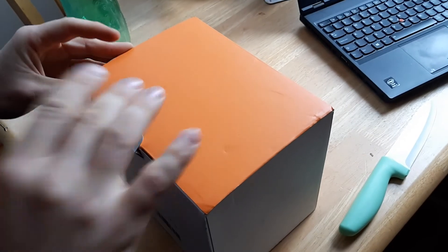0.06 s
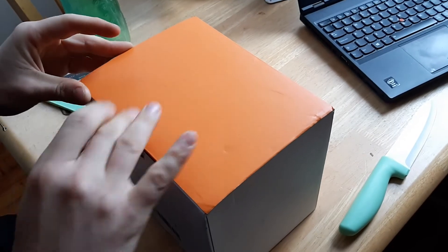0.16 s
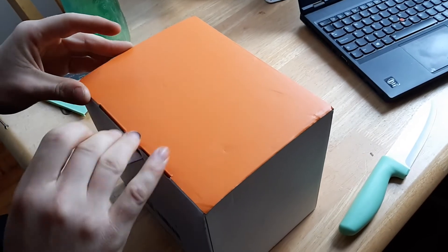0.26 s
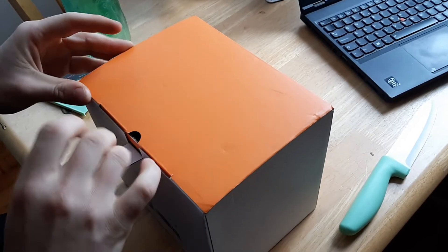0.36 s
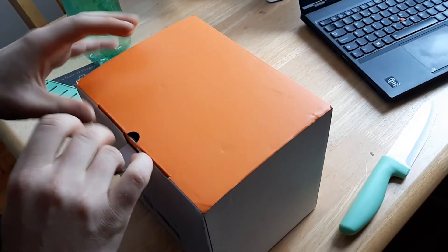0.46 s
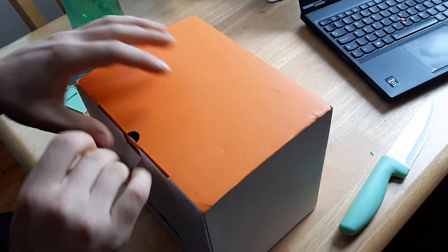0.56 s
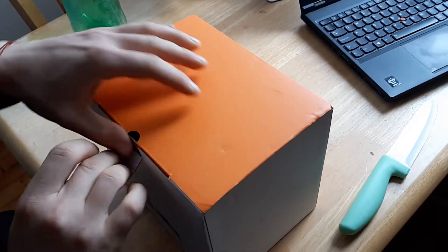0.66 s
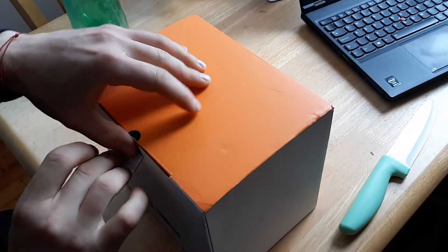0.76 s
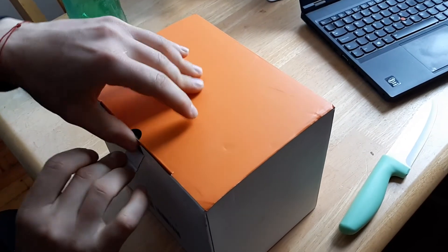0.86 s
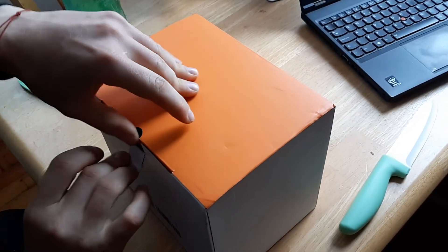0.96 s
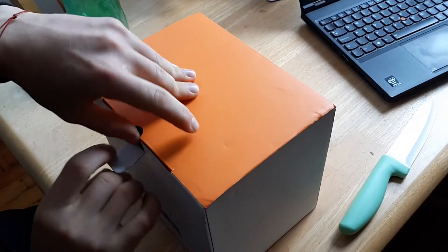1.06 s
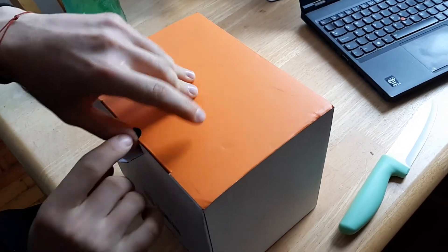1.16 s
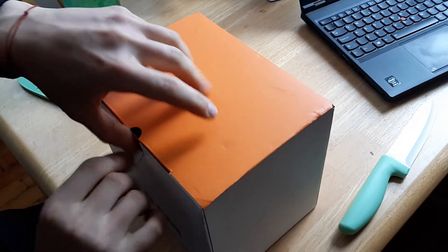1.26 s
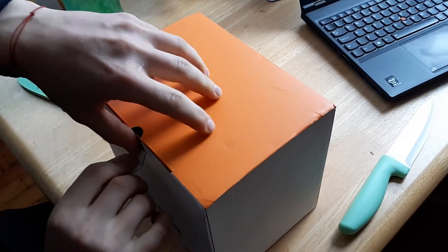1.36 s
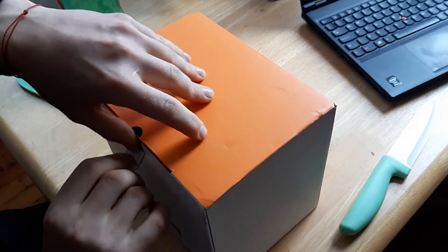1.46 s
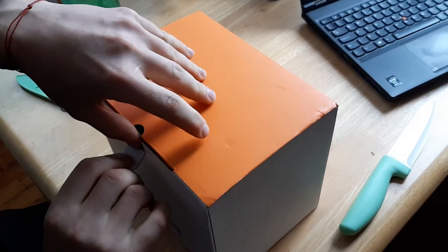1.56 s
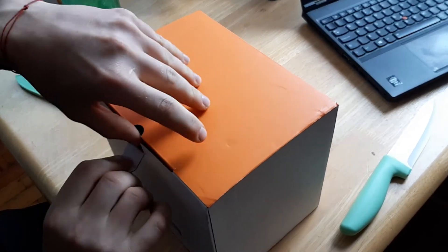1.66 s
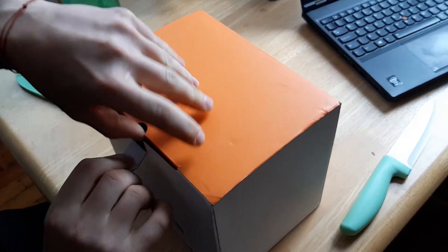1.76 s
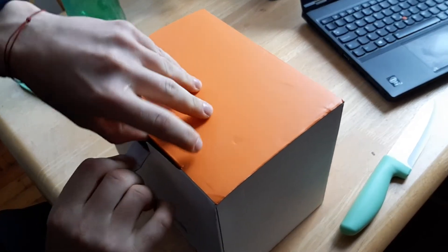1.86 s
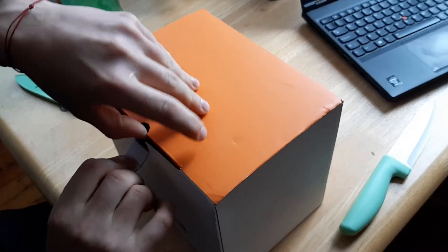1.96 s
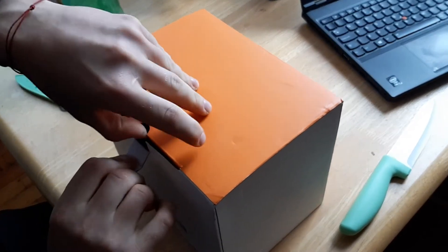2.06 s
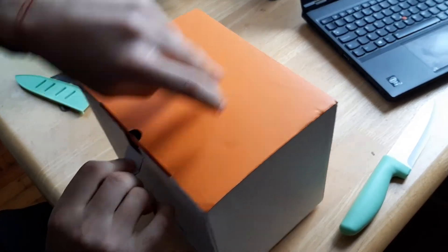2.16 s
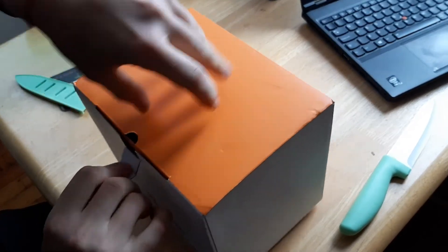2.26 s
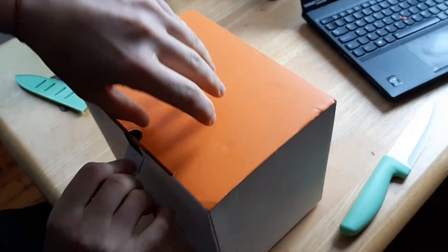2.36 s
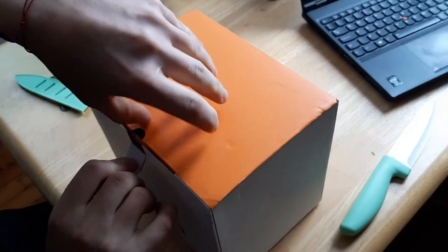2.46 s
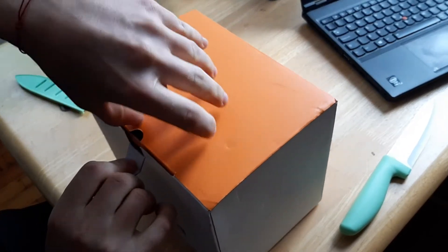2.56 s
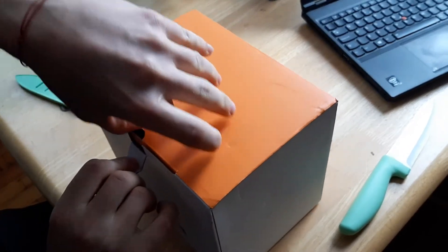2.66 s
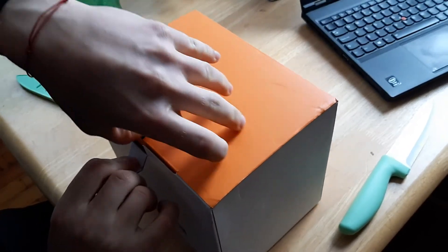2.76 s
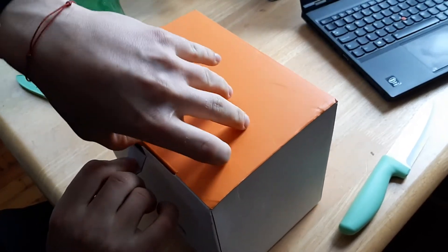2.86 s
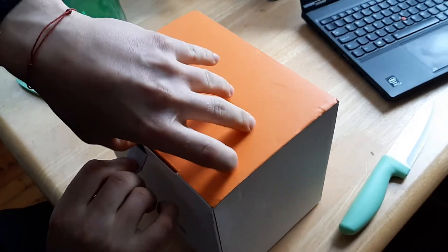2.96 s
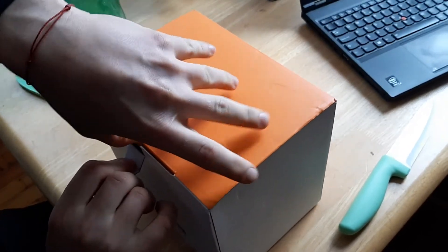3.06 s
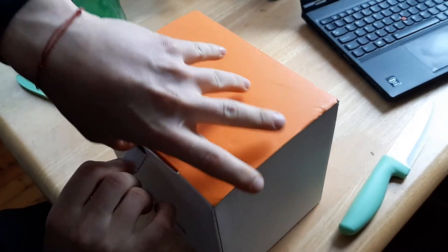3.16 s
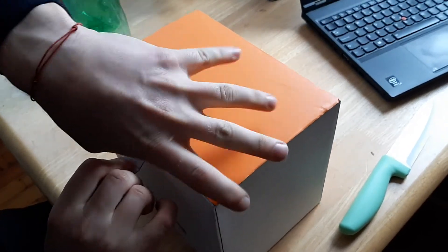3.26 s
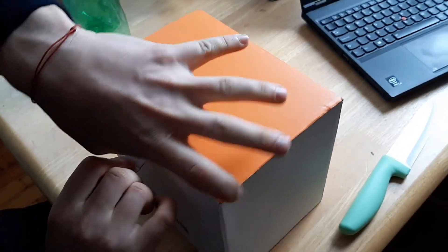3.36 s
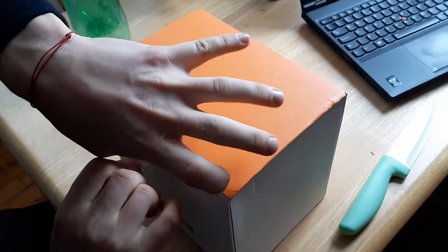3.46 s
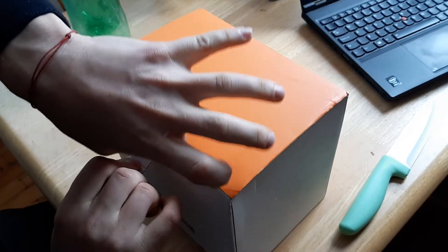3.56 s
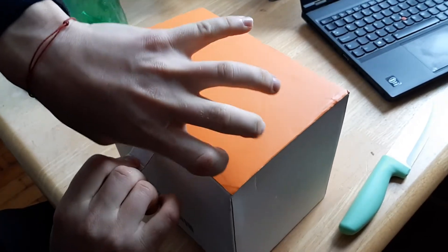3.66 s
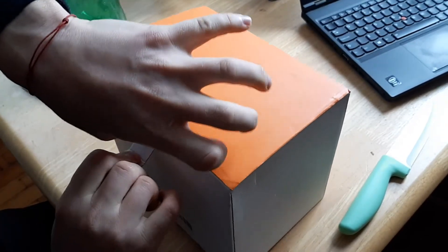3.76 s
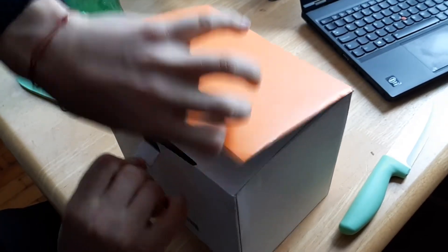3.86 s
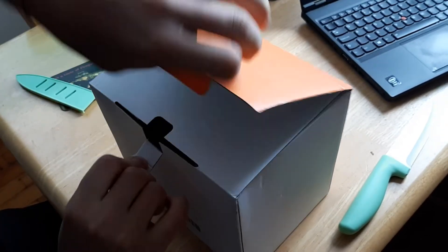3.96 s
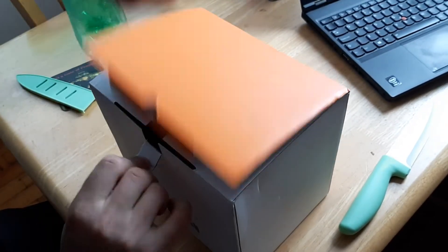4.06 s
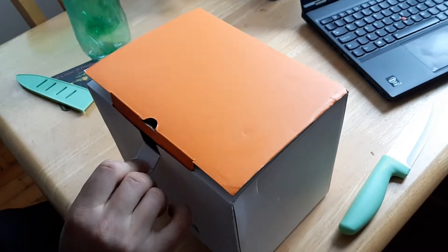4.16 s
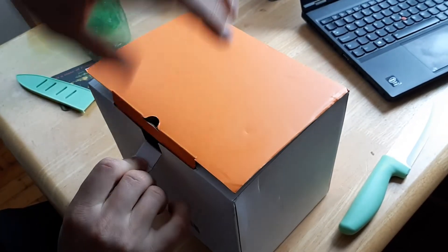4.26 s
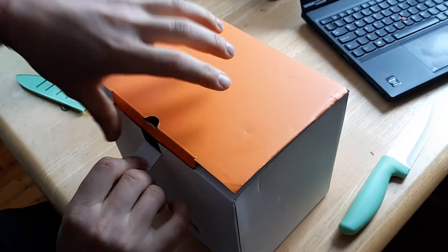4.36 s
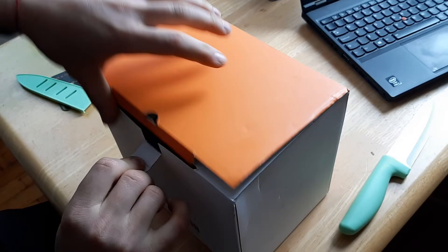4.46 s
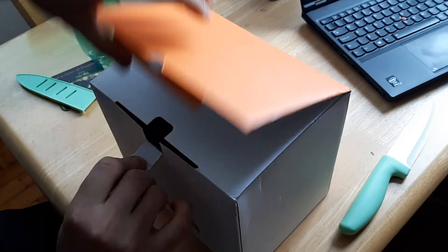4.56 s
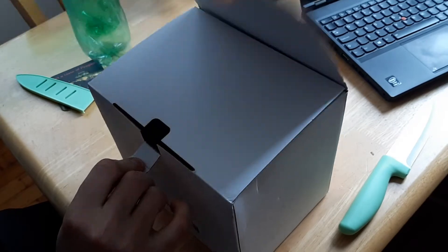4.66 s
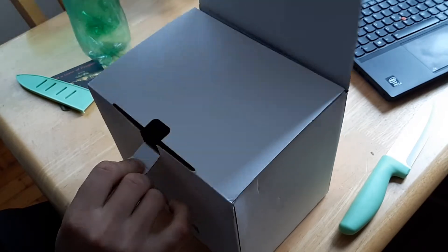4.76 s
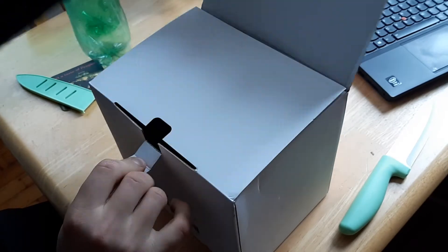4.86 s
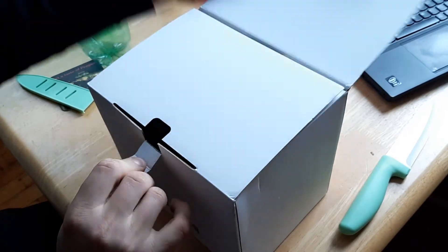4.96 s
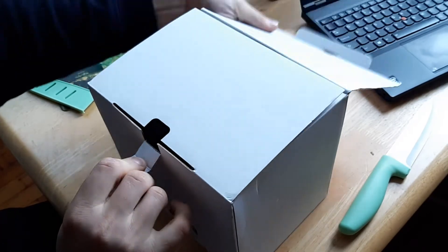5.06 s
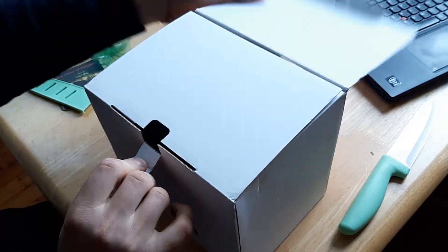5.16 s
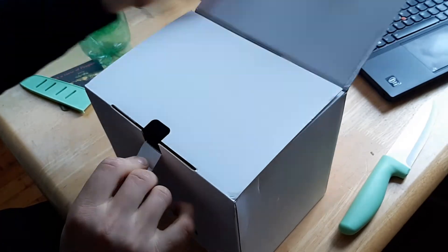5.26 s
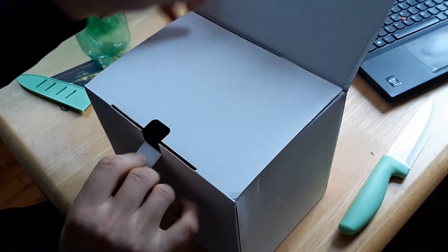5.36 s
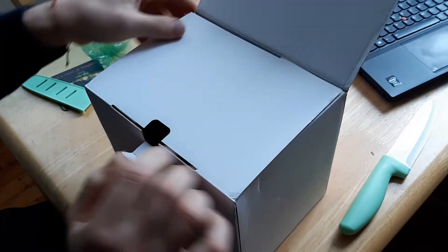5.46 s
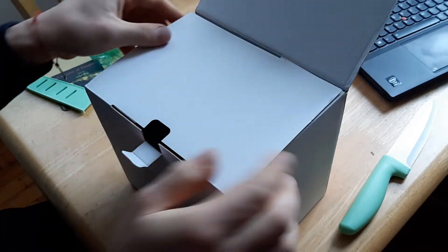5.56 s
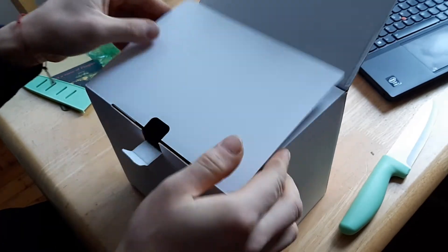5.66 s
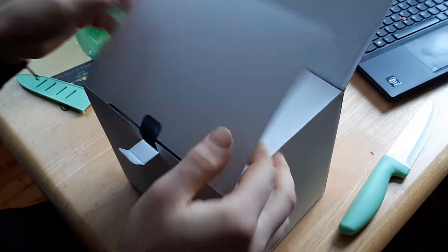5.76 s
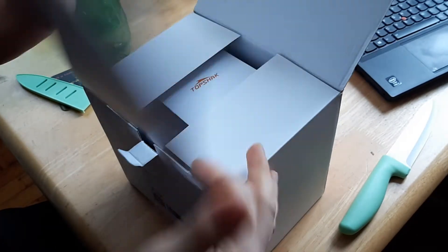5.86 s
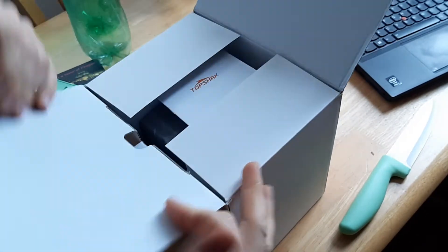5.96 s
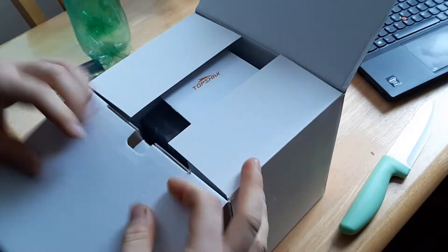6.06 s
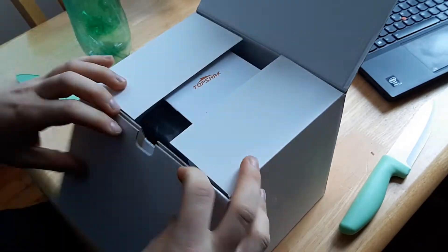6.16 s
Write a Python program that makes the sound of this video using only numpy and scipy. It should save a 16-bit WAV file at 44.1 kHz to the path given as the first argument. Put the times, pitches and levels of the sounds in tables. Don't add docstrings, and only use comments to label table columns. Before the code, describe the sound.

A stiff hollow paperboard box is opened on a wooden table, very close in stereo, in a small bare room with faint hiss. From 0 to 0.8 s there are quiet finger taps, tiny tab clicks and faint brushing. At about 1.0 and 1.25 s come firmer hollow thumps with bright clicks and scratchy rubs, then soft sliding and small ticks. A sharper knock and scrape land at 2.1 s, followed by gentle strokes. At 3.4 to 3.6 s the board snaps, crackles and drags, and the taut lid squeaks loudly. At 3.84 s it pops free in by far the loudest blow, boomy and cracking, ringing about half a second. A small snap follows at 4.1 s, lighter clicks and a short squeak at 4.55 s, a flap swish and puff at 4.8 s, soft strokes near 5.2 s, then knocks, a faint squeak at 5.77 s and scratchy flap scrapes at 6.05 s.

```python
import sys
import numpy as np
from scipy import signal
from scipy.fft import rfft, irfft, next_fast_len
from scipy.io import wavfile
from scipy.ndimage import uniform_filter1d, map_coordinates

SR = 44100
rng = np.random.default_rng(int(sys.argv[2]) if len(sys.argv) > 2 else 0)


def wrap_up_sound(samples):
    columns = np.atleast_2d(samples).T
    tamed = np.clip(columns, -1, 1)
    steps = np.round(tamed * 32767).astype(np.int16)
    wavfile.write(sys.argv[1], SR, steps)


def invert_db(level):
    return 10 ** (np.asarray(level, dtype=float) / 20)


N = 273861
RISE_DB = 39
WANDER_HZ = 45

# (pitch [Hz], width [Hz], level [dB])
BOX_MODES = [(275, 41, -8.5), (323.5, 22, -8.5), (376.2, 12, -2), (544, 220, -14)]
# (pitch [Hz], width [Hz], level [dB])
TABLE_MODES = [(88, 44, -10), (137.6, 16, 0.5), (200, 18, -1)]
# (pitch [Hz], width [Hz], level [dB])
LID_MODES = [(690, 116, -10.5), (803, 54, -11.5), (941, 130, -14), (1300, 430, -22)]
# (frequency [Hz], level [dB])
FIZZ_COLOUR = [(6500, -35.5), (8300, -3), (9500, 3), (12000, 0.5), (14000, 0.5), (15700, 6.5), (16000, -27)]


def unit(x):
    return x / np.sqrt(np.mean(x ** 2) + 1e-20)


def peaked(x):
    return x / np.abs(x).max()


def along(points, hz):
    f, v = np.transpose(points)
    return np.interp(np.log(hz + 1), np.log(f + 1), v)


def filtered(x, response):
    n = x.shape[-1]
    m = next_fast_len(n + min(n, 8192))
    hz = np.fft.rfftfreq(m, 1 / SR)
    return irfft(rfft(x, m) * response(hz), m)[..., :n]


def coloured(x, spectrum):
    return unit(filtered(x, lambda hz: invert_db(along(spectrum, hz))))


def resonant(modes):
    def response(f):
        total = 0
        for k, (hz, width, db) in enumerate(modes):
            total = total + (-1) ** k * invert_db(db) * 1j * f * width / (hz * hz - f * f + 1j * f * width)
        return total
    return response


def uneven(modes, changes_db):
    return resonant([(hz, width, db + change) for (hz, width, db), change in zip(modes, changes_db)])


def no_bass(hz, edge_hz):
    return (1j * hz / (edge_hz + 1j * hz)) ** 3


def diffuse(pair):
    # (frequency [Hz], left-right likeness [-1 to 1])
    likeness = [(60, 1), (130, 0.88), (290, 0.82), (640, 0.11), (1410, -0.32), (3100, 0.23), (6820, -0.21),
                (15000, 0.0)]
    turn = lambda hz: np.arccos(np.clip(along(likeness, hz), -1, 1)) / 2
    mid, side = filtered(pair, lambda hz: np.array([np.cos(turn(hz)), np.sin(turn(hz))]))
    return np.array([mid + side, mid - side])


def stroke_db(late, peak_db, rise_s, t60_s):
    return peak_db + np.where(late < 0, RISE_DB * late / np.abs(rise_s), -60 * late / np.abs(t60_s))


def strokes(rows, column=2):
    rows, t = np.array(rows)[:, :, None], np.arange(0, N, 40) / SR
    db = stroke_db(t - rows[:, 0], rows[:, column], rows[:, 1], rows[:, -1])
    return np.interp(np.arange(N) / SR, t, np.sqrt(np.sum(invert_db(2 * db), axis=0)))


def hands():
    # (time [s], left over right [dB])
    balance = [(0, -0.5), (.7, 3.5), (1.2, 3.5), (1.8, -0.5), (2.2, 2), (2.9, -2.5), (3.4, 1), (3.84, 1.5),
               (4.2, -0.5), (4.7, 3.5), (5.2, -0.5), (5.6, 2.5), (6.2, 1.5)]
    s, pan_db = np.transpose(balance)
    return invert_db(np.interp(np.arange(N) / SR, s, pan_db) * [[.5], [-.5]])


def pop():
    # (pitch [Hz], level [dB], 60 dB decay time [s])
    jolted_modes = [(129.8, -7.5, 0.48), (198, -9.5, 0.42), (248, 0.5, 0.37), (318.3, 0, 0.22),
                    (360, 1, .2), (458.4, -12, 0.29), (571, -16.5, 0.43), (663, -11.5, 0.13),
                    (827, -6, 0.27)]
    t, out = np.arange(SR) / SR, np.zeros((2, N))
    rock = lambda: map_coordinates(rng.standard_normal(60), [t * WANDER_HZ])
    ring = 0
    for hz, db, t60 in jolted_modes:
        level = invert_db(db - 60 * t / t60 + 1.8 * rock())
        apart = (.05 + hz / 1000) * np.array([rock(), rock()])
        ring = ring + level * np.sin(2 * np.pi * hz * t + .4 * rock() + apart)
    swell = 1 - np.exp(-t / 0.006)
    start = round(3.839 * SR)
    out[:, start:start + SR] = invert_db(-4.5) * peaked(filtered(ring * swell, lambda hz: no_bass(hz, 30)))
    return out


def thumps():
    # (time [s], peak [dB], pitch of the struck panel [Hz], lid ring [dB])
    held = [(0.397, -38.5, 297, 2), (0.984, -26.5, 302, -4), (1.011, -20.5, 414, -20),
            (1.031, -20, 332, 1.5), (1.203, -26.5, 335, 0), (2.216, -24, 384, 3), (3.394, -41, 305, 6),
            (3.416, -18, 314, -0.5), (3.533, -33, 394, 12.5), (3.563, -32.5, 380, 5.5),
            (5.398, -25.5, 370, -9)]
    tapped = [(0.196, -41, 417, -20), (0.292, -47.5, 277, -4), (0.348, -36, 270, 10.5),
              (0.741, -42.5, 322, -12), (0.926, -49, 405, 7), (0.936, -34.5, 370, -2.5),
              (1.235, -44, 328, 3), (1.242, -20.5, 319, -0.5), (1.541, -41, 287, -7),
              (1.577, -43, 290, -12), (1.934, -46.5, 350, -4), (2.075, -26.5, 341, -6.5),
              (2.125, -16.5, 306, -8), (2.395, -35.5, 311, -3), (3.333, -52, 317, 8.5),
              (3.839, -9.5, 340, 0.5), (3.848, -18, 347.5, -11), (4.553, -44, 466, 4),
              (5.454, -43.5, 240, 12), (6.019, -35.5, 470, 3), (6.058, -24, 412, 0.5)]
    pushed = [(0.814, -44.5, 284, 1), (1.262, -34, 357, -16), (1.441, -44.5, 232, 6),
              (1.744, -44.5, 366, -7), (2.171, -36, 326, -21), (2.846, -46, 313, 6.5), (3.16, -50, 380, 3),
              (3.817, -35.5, 305, 5), (4.088, -42.5, 250, 18), (4.388, -50, 297, -10),
              (4.463, -47, 360, -1), (5.369, -41, 367, -4)]
    rocked = [
        (4.782, -48.5, 386, 11.5),
        (5.623, -39.5, 200, -17),
        (5.637, -58, 260, -6),
        (5.745, -46.5, 230, -6),
        (5.76, -48.5, 216, -22),
        (6.119, -40, 236, -17),
    ]
    table_boom = [-22, -18.5, -3, 9]
    out, t = np.zeros((2, N + SR)), np.arange(SR // 6) / SR
    push = (t / .00025) * np.exp(-t / 0.00044)
    for kind, boom_db in zip((held, tapped, pushed, rocked), table_boom):
        for s, db, panel_hz, lid_db in kind:
            luck = rng.normal(0, 2.5, 16)
            lid_hz = 810 + 55 * rng.standard_normal()
            wall_ring = uneven(BOX_MODES + [(panel_hz, 45, 5)], luck)
            table_ring = uneven(TABLE_MODES, luck[5:])
            lid_ring = uneven(LID_MODES + [(lid_hz, 60, 1.5)], luck[9:])
            walls, table, lid = filtered(
                push, lambda hz: np.array([no_bass(hz, 120) * wall_ring(hz), table_ring(hz), lid_ring(hz)]))
            side = invert_db(1.6 * luck[14:, None])
            blow = peaked(walls) + invert_db(boom_db) * peaked(table) + invert_db(lid_db) * side * peaked(lid)
            out[:, round(s * SR):][:, :len(t)] += invert_db(db - 3.0) * blow
    return out[:, :N]


def snaps():
    # (time [s], peak [dB],
    # pitch [Hz], fizz [dB])
    snap_events = [(0.191, -53, 1330, 1), (0.398, -44, 1760, -8), (1.0109, -20.5, 1810, -21),
                   (1.2427, -42, 1560, -21), (2.125, -23.5, 1770, -29), (2.2172, -35, 1850, -36),
                   (2.399, -46, 1560, -24), (3.331, -54.5, 1520, -30.5), (3.418, -26, 1300, -19),
                   (3.444, -24.5, 1740, -8), (3.814, -18.5, 1800, -13), (3.8208, -20, 1300, -18),
                   (3.8299, -18, 1860, -19), (3.838, -5, 1970, -16), (4.0888, -23, 2500, -15),
                   (4.102, -38.5, 1710, -22.5), (4.5499, -32, 1950, -4.5), (5.456, -30.5, 2040, -30),
                   (5.618, -38, 1920, -20), (5.7464, -44, 1520, 2), (6.0204, -27, 1390, -30),
                   (6.1212, -27, 2140, -15),
                   (0.189, -50, 5460, -15), (0.2897, -46, 6200, -20), (0.335, -47, 5530, -20),
                  (0.506, -55.5, 5500, -2.5), (0.62, -45.5, 5500, -20), (1.6821, -50, 5300, -25.5),
                  (1.7185, -48, 5400, -25), (1.7184, -46.5, 3100, -25.5), (1.736, -40, 5560, -24),
                  (1.7377, -39, 2950, -25.5), (5.6204, -35, 5190, -14.5), (6.03, -23.5, 4500, -15),
                  (0.345, -31.5, 5900, -22), (0.567, -45, 5340, -11), (0.957, -39, 5100, -30),
                  (1.0054, -23, 5280, -11.5), (1.052, -24.5, 5370, -6), (1.258, -31.5, 5750, -14),
                  (1.3546, -47.5, 4500, 4.5), (1.3828, -42.5, 4660, -21), (1.736, -49, 4040, -26),
                  (2.116, -19.5, 4800, -22), (2.849, -47, 3660, -21), (3.436, -23.5, 3280, -30.5),
                  (3.527, -17.5, 5820, -10.5), (3.5494, -21.5, 3520, -23), (3.8525, -6, 3410, -17),
                  (4.463, -37, 2720, -12), (4.778, -33, 5400, -13.5), (4.7875, -26, 4140, -15.5),
                  (5.412, -43, 4710, -19), (5.6494, -32, 3100, -17), (5.7603, -33, 4830, -2),
                  (5.871, -38.5, 4920, -2), (6.0614, -41.5, 3780, -20),
                   (0.96, -43.5, 1680, -22.5), (0.996, -46.5, 4500, -9), (1.001, -41.5, 2356, -15),
                    (1.018, -35, 5480, -12.5), (1.033, -44, 2180, -6.5), (1.06, -42, 3096, -12),
                    (1.2021, -49.5, 2287, -14), (1.263, -38, 2080, -4.5), (1.265, -46, 3960, -0.5),
                    (0.814, -52, 1490, -26), (1.545, -55, 1500, -17.5), (2.389, -45, 1460, -20),
                    (3.4138, -38.5, 2558, -5), (3.444, -29.5, 4200, -12), (3.531, -29.5, 2640, -5),
                    (3.558, -25, 4600, -15), (3.583, -18.5, 2060, -14.5), (3.591, -20.5, 4300, -14.5),
                    (3.601, -23.5, 4200, -14.5), (3.7522, -37.5, 3150, -20), (3.822, -18.5, 2940, -5.5),
                    (3.844, -23.5, 2402, -15), (4.385, -58, 1965, -15), (4.399, -52, 1200, -20),
                    (4.44, -59, 1634, -18), (4.46, -43, 5200, -12.5), (4.551, -30.5, 5400, -13),
                    (4.7723, -43, 4500, -18), (4.801, -42, 3930, -16.5), (5.3715, -40.5, 1560, -9),
                    (5.456, -42.5, 3100, -20), (5.6243, -34.5, 3060, -16.5), (5.644, -36.5, 4200, -15.5),
                    (5.7616, -31, 1180, -8.5), (5.772, -34, 5070, -9), (5.947, -45, 4750, -11.5),
                    (5.9992, -47.5, 2380, -8.5), (6.0263, -31.5, 5170, -12), (6.061, -27, 1700, -16)]
    # (frequency [Hz], level [dB])
    crack_colour = [(300, -37.5), (900, 1.5), (1500, -10.5), (4500, -13), (6500, -11.5), (7800, -40.5),
                    (9000, -38)]
    out, t = np.zeros((2, N + SR)), np.arange(SR // 30) / SR
    tick = 1. * (np.arange(len(t)) == 200)
    fade = invert_db(-60 * t / 0.009) * (1 - np.exp(-t / 0.0005)) ** 2
    ring_fade = 0.33 * invert_db(-60 * t / 0.014) * (1 - np.exp(-t / .0004))
    for s, db, hz, fizz_db in snap_events:
        wall_db = -6 - 4 * np.log2(hz / 2000) - .06 * (db + 18)
        noise = rng.standard_normal((2, len(t)))
        peak = resonant([(hz, .16 * hz, 1.5)])
        edge = lambda f: invert_db(along(crack_colour, f)) * np.abs(no_bass(f, .45 * hz)) * (0.42 + 1.4 * np.abs(peak(f)))
        ring = ring_fade * np.sin(2 * np.pi * hz * t)
        low = peaked(peaked(fade * filtered(noise[0], edge)) + ring)
        high = invert_db(fizz_db) * peaked(fade * coloured(noise[1], FIZZ_COLOUR))
        even = np.std(low) * unit(filtered(tick, edge)) + np.std(high) * coloured(tick, FIZZ_COLOUR)
        both = np.array([low + high, invert_db(wall_db) * np.roll(even, -150)])
        out[:, round(s * SR):][:, :len(t)] += invert_db(db + 4.0) * both
    return out[:, :N]


def grit(rate, spread_db, smooth):
    clumps = map_coordinates(rng.standard_normal(400), [np.arange(N) * WANDER_HZ / SR], order=1)
    slips = (rng.random(N) < rate / SR) * rng.choice([-1, 1], (2, N)) * invert_db(spread_db * rng.random(N))
    return unit(invert_db(1.5 * clumps) * (unit(slips) + smooth * rng.standard_normal((2, N))))


def patchy(x, patchy_db):
    z = signal.stft(x, nperseg=256)[2]
    field = uniform_filter1d(rng.standard_normal(z.shape[-2:]), size=2, axis=0)
    field = uniform_filter1d(field, size=7, axis=1)
    return unit(signal.istft(z * invert_db(patchy_db * unit(field)), nperseg=256)[1][..., :N])


def rubbing():
    # (peak time [s], rise [s], peak [dB], 60 dB decay time [s])
    presses = [(.188, 0.068, -51, 0.44), (.346, 0.013, -43.5, 0.4), (.396, 0.079, -49, 0.25),
               (.65, 0.03, -57, 1.7), (.744, 0.27, -61, 2), (.984, 0.16, -49, .3),
               (1.008, 0.032, -29, 0.42), (1.26, 0.072, -35, 0.38), (1.586, 0.68, -53, 0.41),
               (1.744, 0.75, -54.5, 1.1), (2.08, 0.025, -41, 0.29), (2.118, 0.017, -35, 0.53),
               (2.396, 0.02, -43.5, 0.21), (2.85, 0.043, -53, 0.52), (3.195, 0.084, -50, 0.45),
               (3.385, 0.18, -56.5, 0.25), (3.418, 0.064, -30.5, 0.4), (3.586, 0.16, -23.5, 0.092),
               (3.656, 0.074, -39.5, 0.39), (3.85, 0.055, -18.5, 0.47), (4.086, 0.021, -38, 0.27),
               (4.4, 0.017, -55.5, 1.55), (4.56, 0.037, -46.5, 0.34), (4.783, 0.057, -48, 0.8),
               (5.162, 0.35, -62.5, 0.36), (5.397, 0.057, -39, 0.5), (5.629, 0.021, -43, 0.26),
               (5.767, 0.21, -48.5, 1.56), (6.059, 0.15, -42.5, 4)]
    # (peak time [s], rise [s], scrape [dB], scratch [dB], 60 dB decay time [s])
    fingers = [(.02, 0.07, -74, -71.5, 0.24), (.11, .15, -68, -86, 0.27), (.188, 0.013, -55.5, -61, 0.55),
               (.346, 0.0083, -50, -54.5, 0.4), (.4, 0.16, -56, -53.5, 0.24), (.6, 8.2, -90, -69, 2.8),
               (.622, .005, -74, -63.5, 1.3), (.66, 0.03, -58.5, -60, .8), (.744, 0.46, -62, -58.5, 3.2),
               (.926, 0.011, -56, -55.5, 0.73), (.96, 0.01, -60, -48, 0.6), (1.008, 0.086, -38, -40, 0.46),
               (1.26, 0.083, -41.5, -43.5, 0.47), (1.586, 1.4, -53.5, -60, 0.5),
               (1.745, 0.21, -57.5, -51.5, 0.41), (1.79, 0.092, -60.5, -56, 0.67),
               (2.118, 0.025, -35.5, -29, 0.39), (2.39, 0.0053, -56.5, -52.5, 0.49),
               (2.85, 0.032, -51, -47, 0.39), (2.97, .2, -87, -60.5, 0.34), (3.176, 0.38, -67.5, -65, 0.97),
               (3.332, 0.015, -51.5, -49, 1.4), (3.72, .2, -58.5, -55, .9)]
    flaps = [(3.417, 0.009, -34.5, -30, 0.36), (3.531, 0.0068, -24, -25, 0.48),
             (3.587, 0.061, -22, -23, 0.16), (3.842, 0.024, -14.5, -14, 0.28),
             (4.085, 0.015, -37, -35, 0.22), (4.386, .004, -64, -64, 1), (4.466, 0.06, -48, -47, 0.42),
             (4.549, 0.018, -55, -57.5, 1.1), (4.69, .2, -71, -53, 0.33), (4.778, 0.035, -48, -46, 0.3),
             (4.85, 0.22, -50.5, -46.5, .7), (5.162, 0.43, -53.5, -50.5, 0.27),
             (5.377, 0.029, -40, -46.5, 0.077), (5.4, 0.0847, -57.5, -53, 3.1),
             (5.629, 0.064, -45.5, -56.5, 0.64), (5.748, .005, -37.5, -42, .3),
             (5.768, 0.047, -39, -42, 0.18), (5.9, 0.86, -55, -50, 0.46), (6.057, 0.12, -30.5, -28.5, 0.41)]
    # (peak time [s], rise [s], peak [dB], 60 dB decay time [s])
    swishes = [
        (.63, .15, -72, 3),
        (1.008, 0.042, -42.5, 0.26),
        (2.246, 0.57, -54, 0.19),
        (2.97, .3, -58, 0.32),
        (3.43, 0.069, -35, 0.33),
        (3.586, 0.11, -34.5, 0.07),
        (4.88, 0.26, -53.5, 0.51),
        (5.162, 0.19, -49.5, 0.22),
        (5.37, 0.026, -58.5, 3.8),
        (5.603, 0.87, -59, 0.86),
    ]
    # (frequency [Hz], level [dB])
    scrape_colour = [(500, -35), (900, -14), (1500, -1.5), (2200, -7), (3200, -15), (5000, -26)]
    scratch_colour = [(1500, -33), (2800, -2.5), (4500, 3), (6200, -2), (7800, -18.5), (9000, -34)]
    press, scrape, scratch = strokes(presses), strokes(fingers + flaps), strokes(fingers + flaps, column=3)
    fizz = np.hypot(invert_db(-8.5) * scratch, strokes(swishes))
    slips = grit(rate=300, spread_db=1.0, smooth=0.87)[0]
    box, table, lid = resonant(BOX_MODES), resonant(TABLE_MODES), resonant(LID_MODES)
    shell = lambda hz: no_bass(hz, 54) * (box(hz) + 0.1 * table(hz) + 1.074 * lid(hz))
    fine = patchy(grit(rate=380, spread_db=3.5, smooth=0.96), patchy_db=3)
    finest = patchy(grit(rate=1500, spread_db=10, smooth=1.3), patchy_db=2)
    surface = scratch * coloured(finest, scratch_colour) + fizz * coloured(finest, FIZZ_COLOUR)
    return invert_db(-4.0) * (press * unit(filtered(slips, shell)) + scrape * coloured(fine, scrape_colour) + surface)


def squeak():
    # (peak time [s], rise [s], peak [dB], 60 dB decay time [s])
    songs = [
        (3.591, 0.088, -18, 0.22),
        (3.69, 0.033, -43, 0.85),
        (4.57, 0.017, -46, 0.27),
        (5.771, 0.097, -39.5, 0.28),
    ]
    # (pitch [Hz], level [dB])
    lid_tones = [(824, 0), (868, -3.5), (1150, -15), (1725, -16)]
    t = np.arange(N) / SR
    drift = map_coordinates(rng.standard_normal((2, 400)), [[[0] * N, [1] * N], [t * WANDER_HZ, t * WANDER_HZ]])
    loose = np.clip((t - 3.62) / .05, .6, 1.5)
    wander = loose * (.7 * drift[0] + drift)
    modes = [invert_db(db) * np.sin(2 * np.pi * hz * t + wander) for hz, db in lid_tones]
    taut = np.clip((4.6 - t) / 0.017, 0, 1)
    lingering = taut * strokes(songs[1:2]) + strokes(songs[2:])
    sung = strokes(songs[:1]) * sum(modes) + lingering * (modes[0] + .3 * modes[1])
    return sung * invert_db([[-1.3], [1.3]])


def chirps():
    # (peak time [s], rise [s], peak [dB], pitch [Hz], 60 dB decay time [s])
    patches = [(.4, .02, -48.5, 1800, 0.069), (.672, .04, -57, 1140, 0.22), (0.74, 0.052, -61, 1470, 0.11),
               (1.015, 0.012, -26, 1820, 0.05), (1.3, .03, -55, 1780, 0.17),
               (1.65, 0.067, -50.5, 1800, 0.12), (3.2, .1, -53.5, 730, 0.23),
               (4.792, 0.0092, -46, 3770, 0.37), (4.78, .02, -41.5, 5600, 0.1), (4.57, .02, -47, 249, 0.38),
               (5.77, 0.022, -45.5, 5200, 0.1), (.352, .01, -52, 910, 0.26), (2.85, .01, -57, 1000, 0.28),
               (3.82, .01, -34, 1300, .15), (3.822, .01, -33, 1700, 0.18), (3.84, .005, -21.5, 2200, 0.063),
               (2.13, 0.011, -41.5, 1805, 0.32), (5.41, .03, -53, 1490, 0.37)]
    out = np.zeros((2, N))
    for s, rise, db, hz, t60 in patches:
        start, n = round((s - .12) * SR), SR // 3
        noise = rng.standard_normal((2, n)) + rng.standard_normal(n)
        patch = resonant([(hz, 0.099 * hz, 0)])
        late = np.arange(start, start + n) / SR - s
        swell = invert_db(stroke_db(late, db, rise, t60))
        out[:, start:start + n] += swell * unit(filtered(noise, lambda f: patch(f) ** 2))
    return out * hands()


def wafts():
    # (time [s], peak [dB])
    puffs = [
        (4.784, -43.5),
        (6.042, -48),
    ]
    t = np.arange(N) / SR - np.array(puffs)[:, :1]
    swell = invert_db(np.array(puffs)[:, 1:]) * (t > 0) * (1 - np.exp(-abs(t) / 0.007)) * invert_db(-60 * abs(t) / 0.23)
    air_colour = [(12, -32.5), (30, -19.0), (70, 0), (110, 9.0), (250, -47.0)]  # (Hz, dB)
    air = coloured(diffuse(rng.standard_normal((2, N))), air_colour)
    return swell.sum(axis=0) * air * invert_db([[1.6], [-1.6]])


def room(x, wet_db, gap):
    # (frequency [Hz], 60 dB decay time [s])
    decay = [(60, 0.69), (130, 0.69), (250, 0.33), (600, 0.27), (2000, 0.37), (6000, 0.34), (14000, 0.19)]
    hop, out = SR // 3, np.zeros((2, N + 2 * SR))
    x = np.pad(x, (hop, 2 * hop))
    for start in range(0, N + hop, hop):
        hz, t, z = signal.stft(rng.standard_normal((2, SR * 3 // 4)), SR, nperseg=512)
        tail = signal.istft(z * invert_db(-60 * t / along(decay, hz)[:, None]), SR, nperseg=512)[1]
        tail = tail * (1 - np.exp(-np.arange(tail.shape[1]) / SR / gap))
        tail = diffuse(tail / np.linalg.norm(tail[0]))
        piece = signal.fftconvolve((x[start:start + 2 * hop] * np.hanning(2 * hop))[None], tail, axes=1)
        out[:, start:start + piece.shape[1]] += piece
    return invert_db(wet_db) * out[:, hop:hop + N]


def room_tone():
    # (frequency [Hz], level [dB per Hz])
    hiss_colour = [(18, -50.5), (40, -22.5), (131, -3), (275, -13.5), (606, -18.5), (2650, -22),
                   (6670, -31), (12500, -15.5)]
    since = np.arange(N) / SR - 3.84
    duck_db = -10 * (since > 0) * np.exp(-abs(since) / 0.71)
    hiss = coloured(diffuse(rng.standard_normal((2, N))), hiss_colour + [(15500, -17.5), (16400, -20.5)])
    return invert_db(-63 + duck_db) * hiss


def scene():
    dull = filtered(thumps(), lambda hz: no_bass(hz, 50))
    (sharp, spread), slide = snaps(), rubbing()
    near = (dull + slide + pop()) * hands()
    delay_s = np.array([[0], [.00016]])
    near = filtered(near, lambda hz: np.exp(-2j * np.pi * hz * delay_s))
    echo = room(invert_db(-2.5) * dull[0] + spread + invert_db(-8.5) * slide[0], wet_db=3.0, gap=0.0016)
    edges = np.array([sharp, np.roll(sharp, 3)]) * hands()
    return near + edges + squeak() + wafts() + echo * invert_db([[.6], [-.6]]) + room_tone() + chirps()


def low_pass(x):
    return signal.sosfilt(signal.butter(12, 15750, fs=SR, output="sos"), x)


def record(dry):
    rounded = dry / (1 + np.abs(dry / 0.98) ** 6) ** (1 / 6)
    mix = filtered(rounded, lambda hz: invert_db(-35 * (hz > 15900)))
    return low_pass(mix)


dry = scene()
out = record(dry)
wrap_up_sound(out)
```